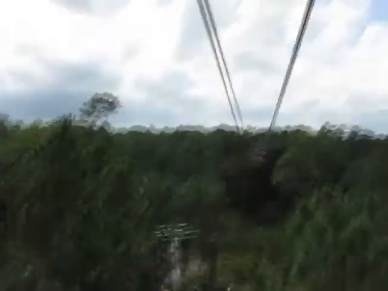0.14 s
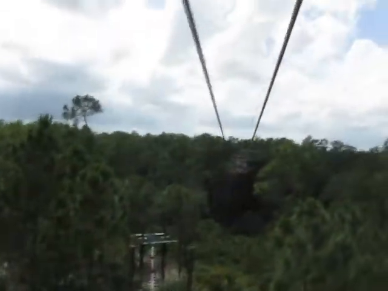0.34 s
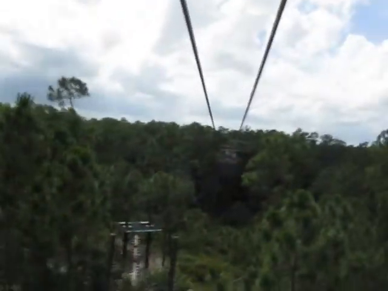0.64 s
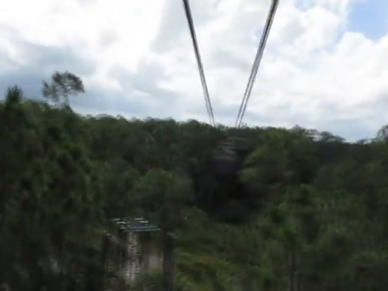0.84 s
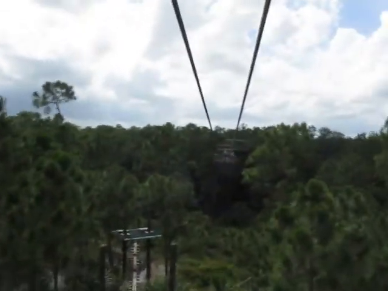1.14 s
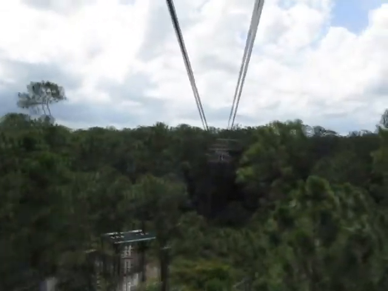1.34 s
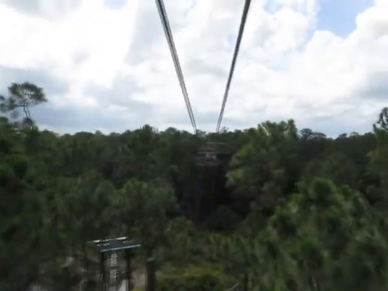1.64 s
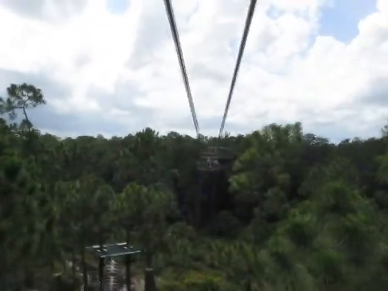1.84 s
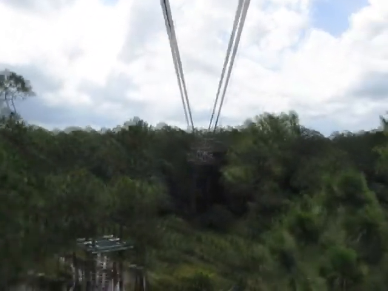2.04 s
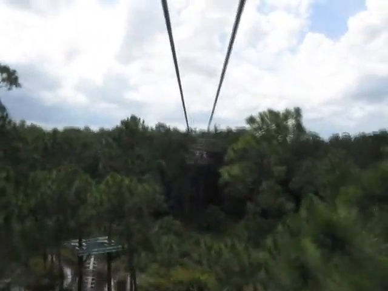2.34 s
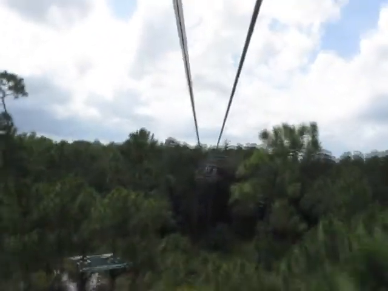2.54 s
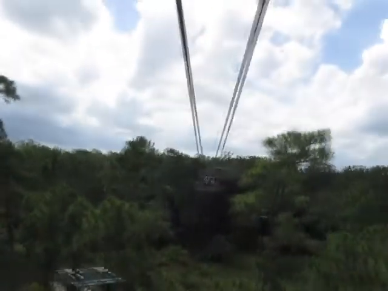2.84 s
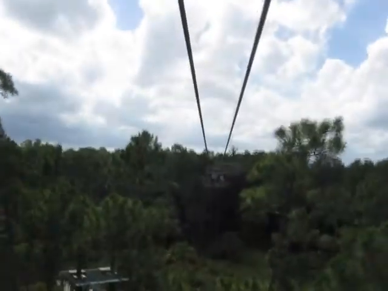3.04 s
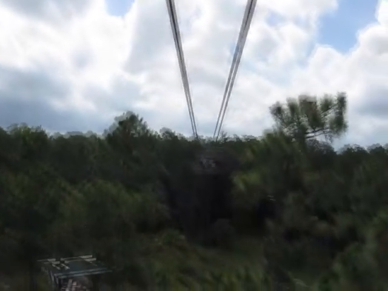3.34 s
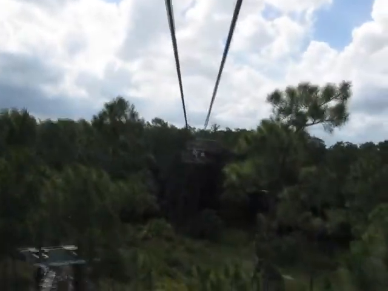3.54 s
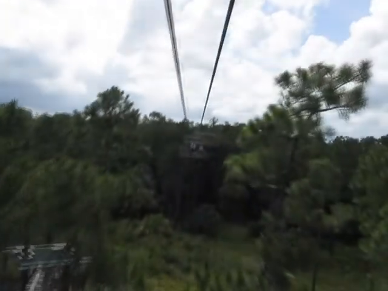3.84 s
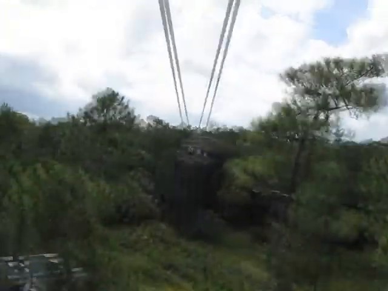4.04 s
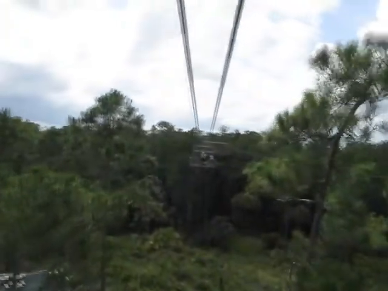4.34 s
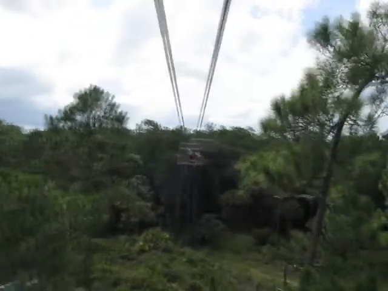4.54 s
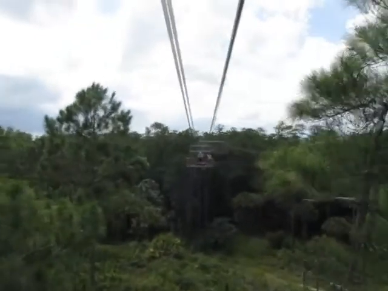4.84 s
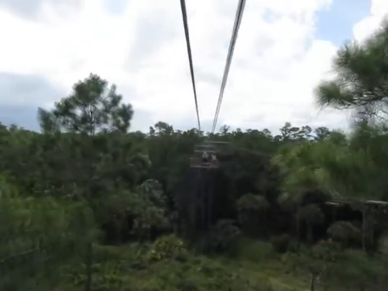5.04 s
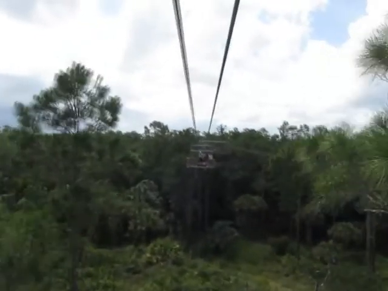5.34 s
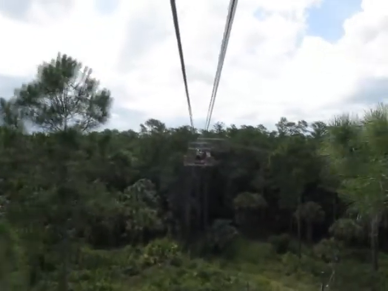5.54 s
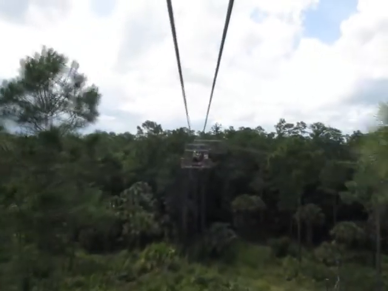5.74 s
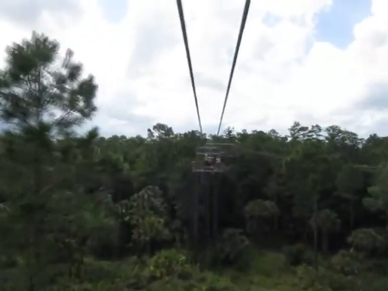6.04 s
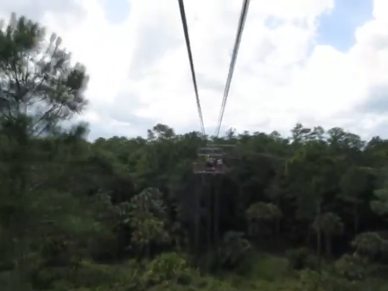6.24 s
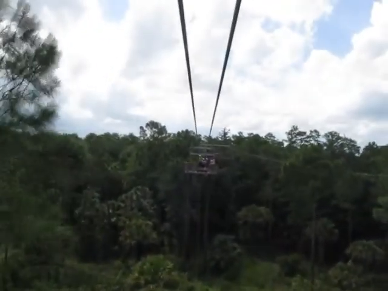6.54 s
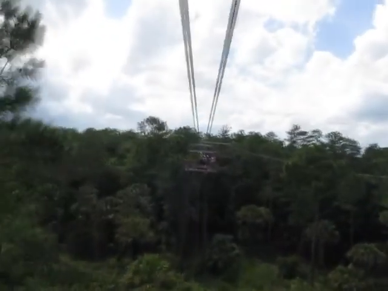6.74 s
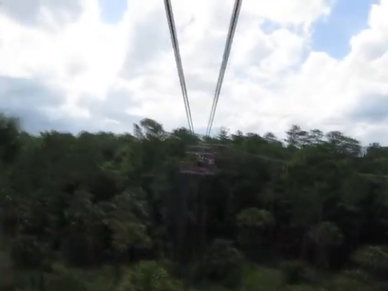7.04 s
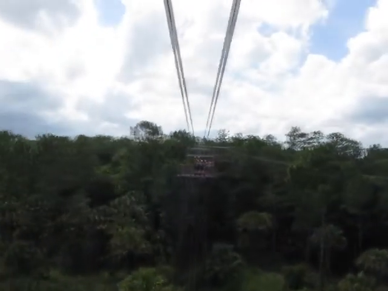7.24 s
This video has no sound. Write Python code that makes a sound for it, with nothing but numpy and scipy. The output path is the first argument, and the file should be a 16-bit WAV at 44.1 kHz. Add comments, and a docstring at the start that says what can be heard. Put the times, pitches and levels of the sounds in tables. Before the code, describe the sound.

Heard from just under the pulleys, a zipline ride above a forest begins with a short scraping squawk and a rasping metallic rattle. A whine climbs in pitch over the steady hiss of wheels on steel cable, with scattered light knocks. Wind rumbles softly on the microphone in gusts. Toward the end the rattling eases, the pitch levels off and a high whirr takes over.

```python
"""A zipline trolley gathers speed along a steel cable above a forest, heard from the rider's place.
At first rolling contact rattles the frame and hisses, air buffets the microphone, and friction gives
one brief squawk. The sheaves bump over the twisted strands and whine ever higher as the speed grows.
From the second second on, flaws in the cable knock the frame. Near full speed the rattle has calmed
and the whirr of the bearings swells."""
import sys
import numpy as np
from scipy import signal
from scipy.fft import rfft, irfft
from scipy.io import wavfile
from scipy.ndimage import uniform_filter1d, map_coordinates

SR = 44100
rng = np.random.default_rng(int(sys.argv[2]) if len(sys.argv) > 2 else 0)


def int16_out(signal):
    """Quantize to a 16-bit WAV file."""
    q = np.round(np.clip(np.atleast_2d(signal).T, -1, 1) * 32767)
    wavfile.write(sys.argv[1], SR, q.astype(np.int16))


N = 326340
TIME = np.arange(N) / SR

# Speed of the trolley. Each row: time in seconds, strands passed per second.
TROLLEY_SPEED = [(0, 152.2), (0.18, 171.6), (0.26, 160.3), (0.38, 184.9), (.52, 194), (.65, 213),
                 (.86, 229), (.93, 225), (1.0, 234.5), (1.75, 281.6), (2.12, 310.7), (2.22, 310),
                 (2.32, 326), (2.41, 308.8), (2.5, 326.7), (2.6, 319.5), (2.68, 336.8), (3.1, 361.0),
                 (3.5, 385), (3.58, 380), (3.68, 393), (3.85, 391), (4.05, 399), (4.2, 400.5),
                 (4.45, 413.7), (5.1, 430.9), (5.35, 443.6), (5.7, 442.8), (5.95, 453.2), (6.3, 456),
                 (6.44, 463), (6.6, 462), (6.98, 466.2), (7.25, 461.9), (7.4, 466.5)]
# Resonances of the frame. Each row: frequency in Hz, width in Hz, relative gain in dB.
FRAME_MODES = [(425, 190, -13), (529, 121, -1), (692, 163, -3), (831, 93, 3), (987, 158, -5.5),
               (1257, 88, -3), (1600, 120, -12)]
# Resonances of the side plates. Each row: frequency in Hz, width in Hz, relative gain in dB.
PLATE_MODES = [(1620, 150, 0), (2097, 160, 3.5), (2348, 230, 0), (2770, 250, -7), (3730, 160, -13.5),
               (4300, 380, -10.5)]
# Jolts of the trolley. Each row: centre in seconds, change of rattle in dB, change of rasp in dB.
SHAKE_JOLTS = [(.2, -1, -1.5), (.42, 0.5, 2), (.6, 1, 3.5), (.78, 1.5, 3.5), (1.55, -2, 1),
               (2.16, 4.5, 1.5), (2.5, 0.5, -1), (2.849, 4.5, -0.5), (3.05, 4, 1.5), (3.3, 6, 0),
               (3.55, 1, -4), (3.75, 2.5, 5), (3.93, -2.5, 3.5), (4.12, 0, 3), (4.5, -1, 2), (5.15, 3.5, 6),
               (5.56, 1, 6.5)]
# The load eases or bears down. Each row: centre in seconds, half-length in seconds, change in dB.
LOAD_LURCHES = [(0.68, .02, -1.5), (0.865, .035, -3.5), (1.022, 0.0092, 3.5), (1.063, 0.031, -4),
                (1.963, .025, 2.5), (2.5, .02, 2.5), (2.63, .02, -1), (2.764, 0.039, 2),
                (3.13, 0.018, -2.5), (7.066, 0.0092, -1)]
# Spectrum of the contact hiss. Each row: frequency in Hz, relative density in dB.
HISS_SPECTRUM = [(200, -9), (400, 5), (1100, -1.5), (1800, 2), (2300, 0), (3200, -1), (3900, -2),
                 (4500, -1.5), (4900, -6), (5500, -16), (6500, -16), (7300, -27), (8000, -34),
                 (8900, -53.5)]
# Course of the hiss. Each row: time in seconds, relative level in dB.
HISS_ENVELOPE = [(0.04, -40.5), (0.14, -43), (.29, -42.5), (0.345, -41.5), (0.6, -38.5), (0.86, -38.5),
                 (1.6, -40.5), (2.15, -39), (3.7, -37.5), (5.16, -38.5), (6.8, -37), (7.35, -37.2)]
# Resonances of the sheaves. Each row: frequency in Hz, width in Hz, level at full speed in dB.
SHEAVE_MODES = [(3660, 42, -50), (7375, 35, -78)]
# Spectrum of the ticking wires. Each row: frequency in Hz, relative density in dB.
WIRE_SPECTRUM = [(1500, 2.5), (3000, 0), (4600, 0), (5500, -6.5), (6500, -11), (7300, -21.5), (8900, -48)]
# Harmonics of the whine, from the first up. Each row: relative level in dB, change before onset in dB,
# onset speed in strands per second, bloom just after onset in dB.
WHINE_HARMONICS = [(-2, -3, 284.4, 6), (3.5, -12.5, 227.3, -1.5), (-7.5, 4, 252.3, 16.5),
                   (-16.5, 2, 336, 10)]
# Resonances the whine glides through. Each row: frequency in Hz, width in Hz, relative gain in dB.
WHINE_RESONANCES = [(177, 71, -32), (316.4, 93, -31), (399, 60, -28.5), (439.7, 48, -24), (476, 25, -33.5),
                    (530, 220, -33), (714, 148, -32.5), (809.5, 50, -33), (936, 194, -30), (1215, 62, -31),
                    (1328, 157, -27.5)]
# The sheave loses or gains grip. Each row: centre in seconds, half-length in seconds,
# change of the fundamental in dB, change of the upper harmonics in dB.
GRIP_SLIPS = [(0.239, 0.025, -25, -11), (.67, 0.029, 1, -9), (0.748, 0.038, 2, -6), (1.063, .02, 2, -8),
              (1.57, .035, -1, 1), (1.665, 0.02, 1, -1), (2.06, 0.038, -0.5, -16), (2.27, .15, 2, -6.5),
              (3.36, 0.0088, -2.5, -4), (3.67, 0.053, 1.5, 1), (5.537, 0.032, -0.5, -1.5),
              (7.05, .03, -1, -2.5)]
# Weak tones of sheaves and bearings. Each row: multiple of the strand rate, base level in dB, width in Hz.
WEAK_TONES = [(.4, -55, 17), (1.169, -53, 14), (1.5, -50.5, 8), (1.85, -50.5, 23), (2.171, -49.5, 11),
              (3.2, -48, 15), (3.5, -50.5, 2.2), (3.999, -47.5, 5.3), (5, -48.5, 10), (5.289, -44, 10),
              (6.279, -48, 20), (6.6, -49, 21)]
# Spectrum of the rushing air. Each row: frequency in Hz, relative density in dB.
AIR_SPECTRUM = [(20, -13), (45, -9.5), (85, -1.5), (130, -1), (180, 3.5), (250, 0), (400, -1.5),
                (900, -36.5)]
# Gusts on the microphone. Each row: centre in seconds, half-length in seconds, rise in dB.
AIR_GUSTS = [(.6, 0.33, 8.5), (1.38, 0.29, 9.5), (1.85, 0.31, 7.5), (3.206, 0.13, 4), (3.755, 0.081, 10),
             (4.35, 0.36, 6), (5.02, 0.067, 6), (6.21, 0.17, 10), (6.798, 0.29, 3)]
# Flaws in the cable. Each row: start in seconds, level in dB.
CABLE_FLAWS = [(1.368, -27), (1.452, -29.5), (1.667, -27), (2.325, -24), (4.8, -29), (4.95, -28),
               (5.897, -28), (6.02, -29.5), (6.109, -27.5), (7.03, -30.5)]
# Resonances that a flaw rings. Each row: frequency in Hz, width in Hz, relative gain in dB.
FLAW_MODES = [(392, 36, -1.5), (512, 60, -1), (830, 33, 0)]
# Spectrum of the bearings at full speed. Each row: frequency in Hz, relative density in dB.
BEARING_SPECTRUM = [(1600, -20.5), (2100, 1.5), (2450, 0), (2750, 4.5), (3100, 0.5), (3400, -5),
                    (4200, -39.5)]
# Course of the bearings' whirr. Each row: time in seconds, level in dB.
BEARING_ENVELOPE = [(0, -67.5), (3.5, -45.5), (5.0, -46), (5.3, -38.5), (6.1, -38.5), (6.55, -38),
                    (6.83, -36), (7.0, -37), (7.4, -37.3)]


def from_db(db):
    """Amplitude grows tenfold with every 20 dB."""
    return 10 ** (np.asarray(db) / 20)


def rms_one(x):
    """Normalisation to unit power."""
    return x / np.sqrt(np.mean(np.abs(x) ** 2) + 1e-20)


def in_time(rows):
    """Linear interpolation of (seconds, value) rows."""
    return np.interp(TIME, *np.transpose(rows))


def swell(centre_s, half_s):
    """A Gaussian pulse of height 1."""
    return np.exp(-((TIME - centre_s) / half_s) ** 2)


def drift(rate_hz):
    """Low-pass noise: a smooth random wandering of spread 1."""
    hz = np.arange(N // 2 + 1) * SR / N
    return rms_one(irfft(rfft(rng.standard_normal(N)) / (1 + (hz / rate_hz) ** 2), N))


def coloured(x, spectrum):
    """Spectral shaping by a smooth curve that rolls off beyond its ends; unit power."""
    hz, db = np.transpose(spectrum)
    grid = np.maximum(np.arange(N // 2 + 1) * SR / N, 1)
    skirts = 1 / (1 + (grid / hz[-1] / 2) ** 4) / (1 + (hz[0] / grid / 2) ** 2)
    gain = from_db(np.interp(np.log(grid), np.log(hz), db))
    return rms_one(irfft(rfft(x) * skirts * gain, N))


def resonate(x, hz, width_hz):
    """A damped resonator with gain 1 at its peak."""
    r = np.exp(-np.pi * width_hz / SR)
    feedback = [1, -2 * r * np.cos(2 * np.pi * hz / SR), r * r]
    return signal.lfilter(np.array([1, 0, -1]) * (1 - r * r) / 2, feedback, x)


def lorentzian(hz, centre_hz, width_hz):
    """The bell-shaped curve of a resonance, of height 1."""
    return 1 / (1 + (2 * (hz - centre_hz) / width_hz) ** 2)


def body(force, modes, band_hz=None):
    """Modal superposition: resonances add with alternating signs, band-limited if asked; unit power."""
    motion = sum((-1) ** k * from_db(db) * resonate(force, hz, width)
                 for k, (hz, width, db) in enumerate(modes))
    if band_hz:
        motion = signal.sosfilt(signal.butter(2, band_hz, "band", fs=SR, output="sos"), motion)
    return rms_one(motion)


def strand_rate(sway_strands_per_s=2.2, bounce_hz=5.2, sag_hz_per_s=0.295):
    """The cable's oscillation modulates the speed, more slowly as the anchor falls behind."""
    bounces = np.cumsum(bounce_hz - sag_hz_per_s * TIME) / SR
    return in_time(TROLLEY_SPEED) + sway_strands_per_s * np.sin(2 * np.pi * bounces) + 0.5 * drift(6)


def contact(phase, strand_depth, pair_depth, rough_db):
    """Rough steel on steel makes noise, amplitude-modulated at every strand and every pair of strands."""
    modulation = 1 + strand_depth * np.cos(phase) + pair_depth * np.cos(phase / 2)
    return rng.standard_normal(N) * modulation * from_db(rough_db * drift(47))


def strand_bumps(phase, wobble=0.26):
    """A nearly periodic force: harmonics 4 to 8 of the strand rate, wandering in phase."""
    return sum(np.cos(k * phase + wobble * k * drift(16) + rng.uniform(0, 2 * np.pi)) for k in range(4, 9))


def frame_rattle(phase, speed, slow_db=-25, calm_db=-15.5):
    """Forced vibration: the contact drives the frame's modes, which calm steadily with speed."""
    force = contact(phase, strand_depth=0.28, pair_depth=0.15, rough_db=1.0)
    force += from_db(-25) * strand_bumps(phase)
    jolt_db = sum(db * swell(s, half_s=0.094) for s, db, _ in SHAKE_JOLTS)
    level_db = slow_db + calm_db * speed ** 2.88 + jolt_db
    return from_db(level_db) * body(force, FRAME_MODES, band_hz=(300, 1800))


def plate_rasp(phase, speed, slow_db=-36.5, calm_db=-16.5):
    """Forced vibration of the thin side plates: a brighter rasp that calms only near full speed."""
    force = contact(phase, strand_depth=0.11, pair_depth=0.081, rough_db=1.5)
    force += from_db(-22) * strand_bumps(phase)
    jolt_db = sum(db * swell(s, half_s=0.094) for s, _, db in SHAKE_JOLTS)
    level_db = slow_db + calm_db * speed ** 21 + jolt_db
    return from_db(level_db) * body(force, PLATE_MODES, band_hz=(1450, 4800))


def sheave_load(slowness, waver_db=0.54):
    """Contact noise follows the load: a gain that lurches briefly and wavers, most while slow."""
    lurch_db = sum(db * swell(s, half_s) for s, half_s, db in LOAD_LURCHES)
    return from_db(waver_db * slowness * drift(5.8) + lurch_db)


def cable_hiss(phase, slowness, slow_ring_db=-7):
    """Broadband excitation by the wires' fine roughness gives a hiss and keeps the sheaves ringing."""
    rub = contact(phase, strand_depth=0.11, pair_depth=0.064, rough_db=0.62 + 0.89 * slowness)
    ring = sum(from_db(db) * rms_one(resonate(resonate(rub, hz, width), hz, 10 * width))
               for hz, width, db in SHEAVE_MODES)
    return coloured(rub, HISS_SPECTRUM), ring * from_db(slow_ring_db * slowness)


def wire_ticks(slowness, ticks_per_s=480, spread_db=2.5, against_hiss_db=-10.5, slow_db=3):
    """Shot noise: single wires click at random under the sheaves, more plainly while slow."""
    sizes = rng.choice([-1, 1], N) * from_db(spread_db * np.clip(rng.standard_normal(N), -2, 2))
    clicks = sizes * (rng.random(N) < ticks_per_s / SR)
    return from_db(against_hiss_db + slow_db * slowness) * coloured(clicks, WIRE_SPECTRUM)


def whine(phase, strand_hz, slowness, onset_range_hz=2.8, bloom_range_hz=38):
    """Periodic forcing by the strands gives four harmonics; each swells as it crosses a resonance."""
    shaky_phase = phase + 0.14 * drift(27) + 0.8 * slowness ** 4 * drift(42)  # rough while slow
    low_slip_db = sum(db * swell(s, half_s) for s, half_s, db, _ in GRIP_SLIPS)
    high_slip_db = sum(db * swell(s, half_s) for s, half_s, _, db in GRIP_SLIPS)
    out = 0
    for k, (base_db, slow_db, onset_hz, bloom_db) in enumerate(WHINE_HARMONICS, 1):
        flutter_db = (3 * slowness - 0.16) * drift(9) + 0.5 * k * drift(1.5)
        tone = rms_one(from_db(flutter_db) * -np.cos(k * shaky_phase))
        power = sum((from_db(db) * lorentzian(k * strand_hz, hz, width)) ** 2
                    for hz, width, db in WHINE_RESONANCES)
        before_onset = 1 / (1 + np.exp((strand_hz - onset_hz) / onset_range_hz))
        bloom = (1 - before_onset) * np.exp(-np.maximum(strand_hz - onset_hz, 0) / bloom_range_hz)
        slip_db = low_slip_db if k == 1 else high_slip_db
        level_db = base_db + slow_db * before_onset + bloom_db * bloom + slip_db
        out += from_db(level_db) * np.sqrt(power) * tone
    return out


def overtones(phase, strand_hz, slowness, plate_hz=1970, plate_width_hz=140, plate_db=4):
    """Narrow noise bands of sheaves and bearings climb with speed and swell at the plates' resonance."""
    out = 0
    for multiple, db, width in WEAK_TONES:
        wavering = drift(width) + 1j * drift(width)
        tone = rms_one(np.real(wavering * np.exp(1j * multiple * phase)))
        ring_db = plate_db * lorentzian(multiple * strand_hz, plate_hz, plate_width_hz)
        slow_db = -4 * (1 + multiple) * slowness  # high tones sing only when fast
        out += tone * from_db(db + ring_db + slow_db)
    return out


def wind(steady_db=-50.5, lump_db=2.2):
    """Turbulence at the microphone: a lumpy low rush of air that swells in gusts."""
    gust_db = sum(db * swell(s, half_s) for s, half_s, db in AIR_GUSTS)
    rush = coloured(rng.standard_normal(N), AIR_SPECTRUM) * from_db(lump_db * drift(19))
    return from_db(steady_db + gust_db) * rms_one(rush)


def squawk(peak_s=0.236, peak_db=-21, hz=855, wander_hz=55, rise_db_per_s=57, fall_db_per_s=140):
    """Stick-slip friction swells the frame's main resonance into a rough scrape, then lets go."""
    level_db = peak_db - np.maximum(rise_db_per_s * (peak_s - TIME), fall_db_per_s * (TIME - peak_s))
    phase = 2 * np.pi * np.cumsum(hz + wander_hz * drift(130)) / SR
    rough_db = 3.5 * drift(90)
    return from_db(level_db) * rms_one(np.sin(phase) * from_db(rough_db))


def knocks(decay_s=0.022):
    """Impact excitation: each flaw starts an exponentially fading chatter in the frame's low modes."""
    envelope = sum(from_db(db) * (TIME > s) * np.exp(-np.abs(TIME - s) / decay_s) for s, db in CABLE_FLAWS)
    return uniform_filter1d(envelope, size=128) * body(rng.standard_normal(N), FLAW_MODES)


def bearing_whirr(phase, speed):
    """Frequency scales with rotation rate: the bearings' noise band climbs, and swells near full speed."""
    band = coloured(rng.standard_normal(N), BEARING_SPECTRUM)
    climbing = map_coordinates(band, [np.cumsum(speed)], order=3, mode="nearest")
    modulation = 1 + 0.31 * np.cos(phase) + 0.16 * np.cos(phase / 2)
    return from_db(in_time(BEARING_ENVELOPE)) * rms_one(climbing * modulation)


def scene(hiss_gain_db=5):
    """Superposition of trolley and wind; the strand rate paces the rolling sounds."""
    strand_hz = strand_rate()
    speed = strand_hz / strand_hz.max()
    slowness = 1 - speed
    phase = 2 * np.pi * np.cumsum(strand_hz) / SR
    load = sheave_load(slowness)
    hiss, ring = cable_hiss(phase, slowness)
    hiss_gain = load * from_db(in_time(HISS_ENVELOPE) + hiss_gain_db)
    tones = whine(phase, strand_hz, slowness) + overtones(phase, strand_hz, slowness) + squawk()
    shaking = frame_rattle(phase, speed) + load * plate_rasp(phase, speed)
    rolling = hiss_gain * (hiss + wire_ticks(slowness)) + ring + bearing_whirr(phase, speed)
    return (shaking + rolling + tones + knocks() + wind())[None]


def record(dry, ceiling=0.25, cutoff_hz=9100):
    """Soft saturation and low-pass filtering: the small camera rounds the peaks and cuts the top."""
    low_pass = signal.ellip(10, 0.1, 80, cutoff_hz, fs=SR, output="sos")
    return signal.sosfilt(low_pass, ceiling * np.tanh(dry / ceiling))


dry = scene()
out = record(dry)
int16_out(out)
```